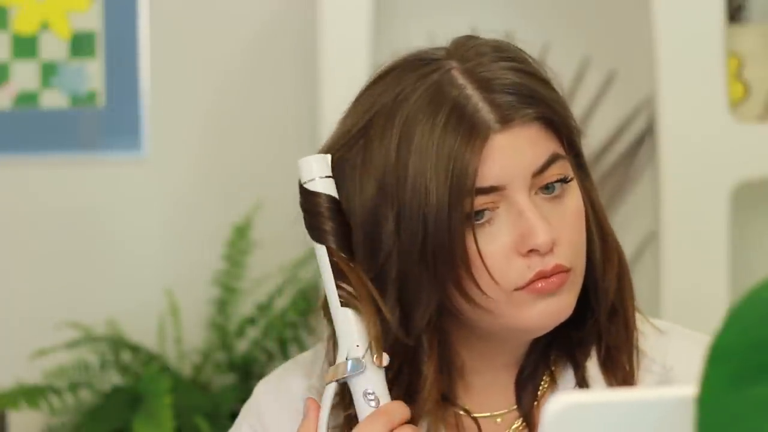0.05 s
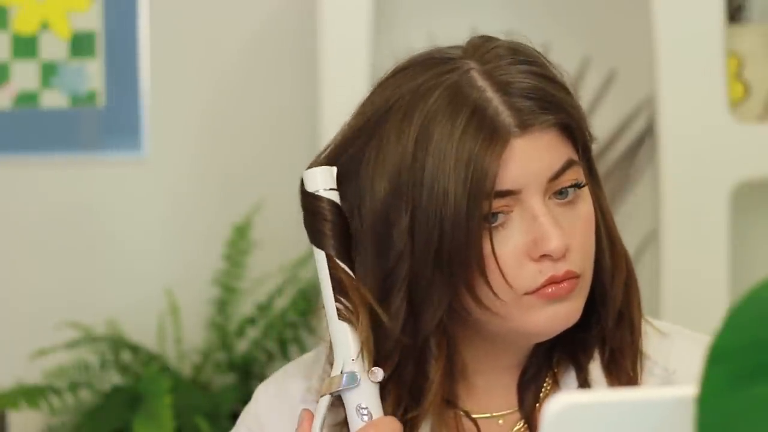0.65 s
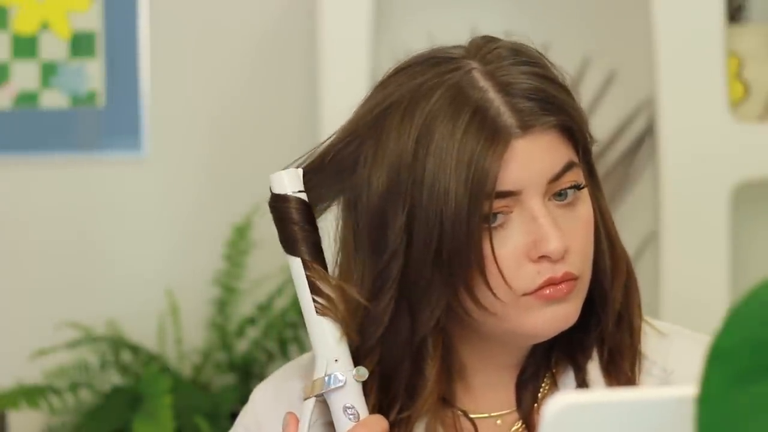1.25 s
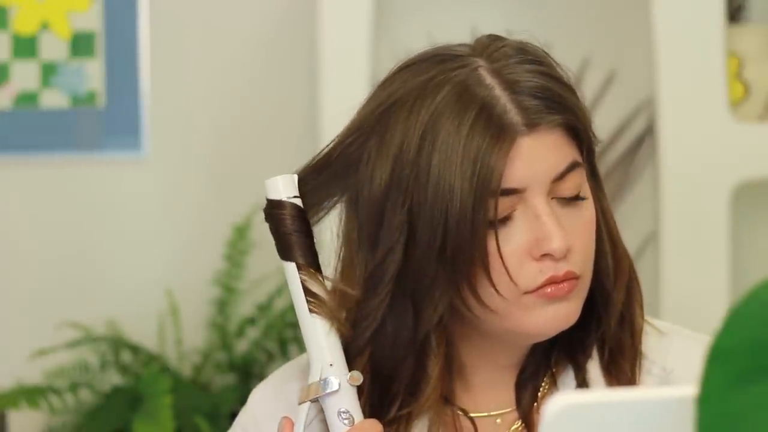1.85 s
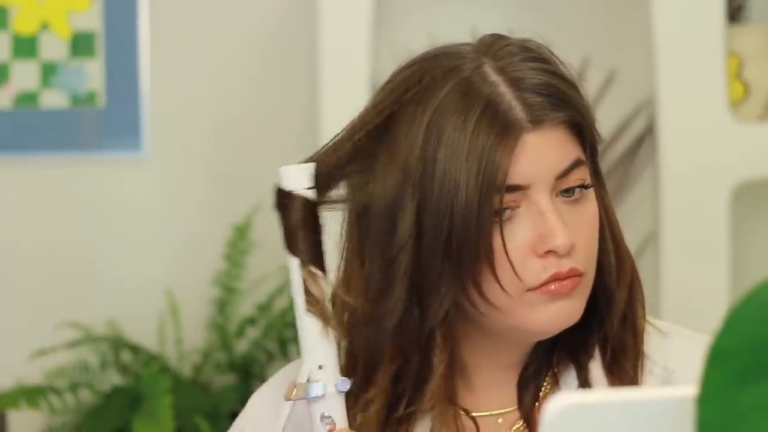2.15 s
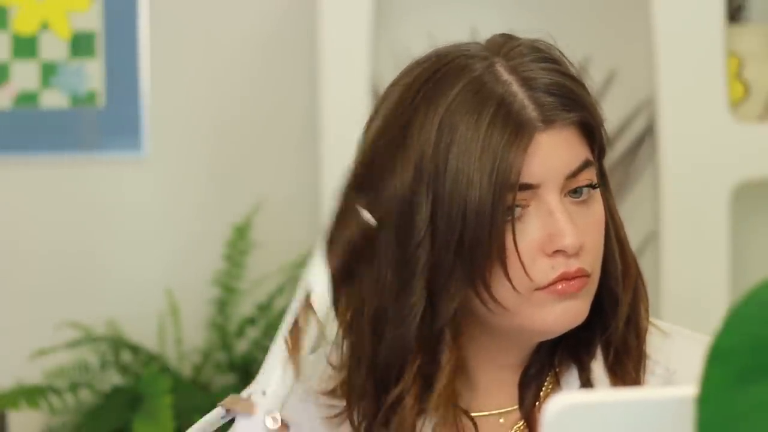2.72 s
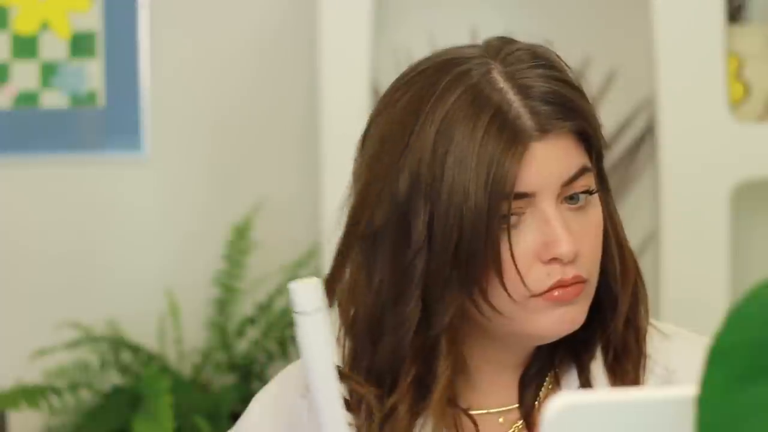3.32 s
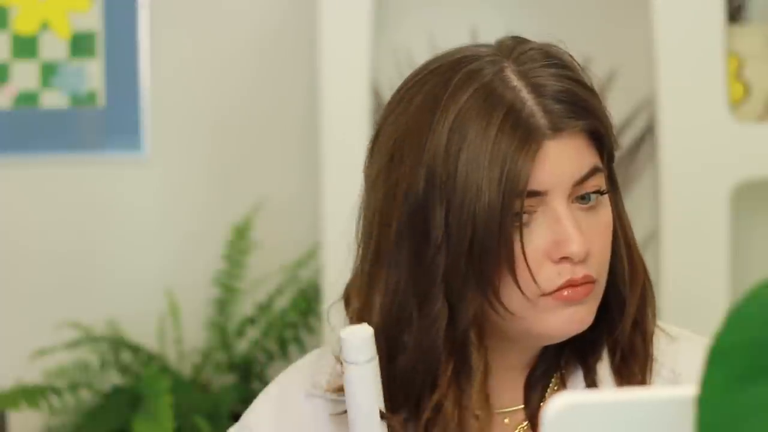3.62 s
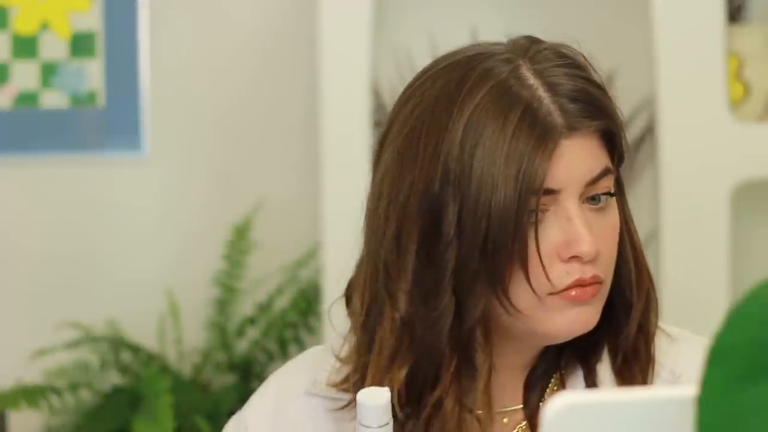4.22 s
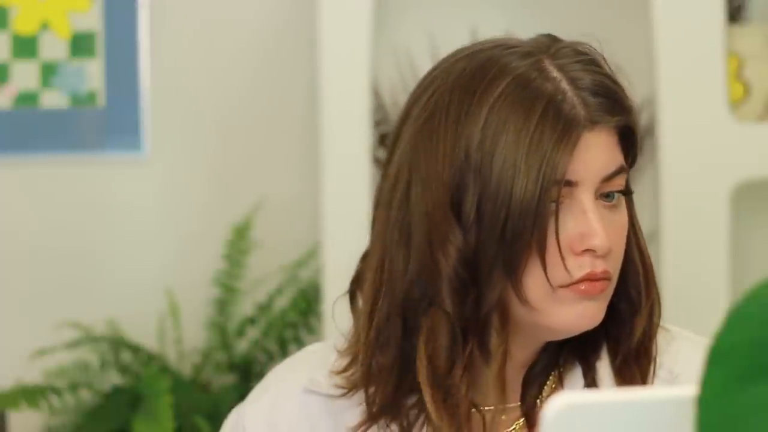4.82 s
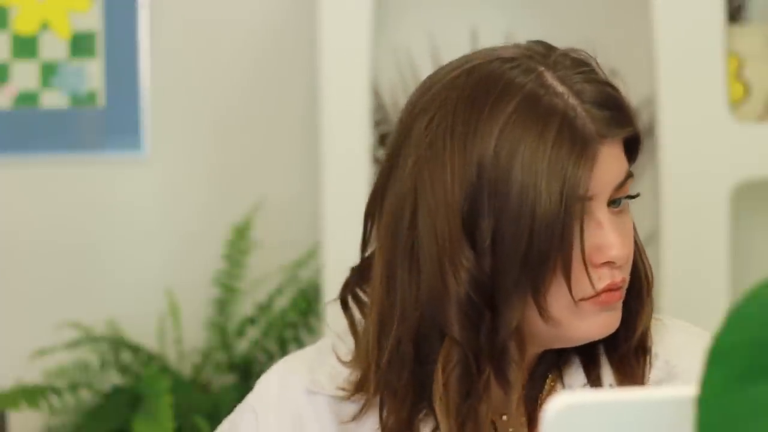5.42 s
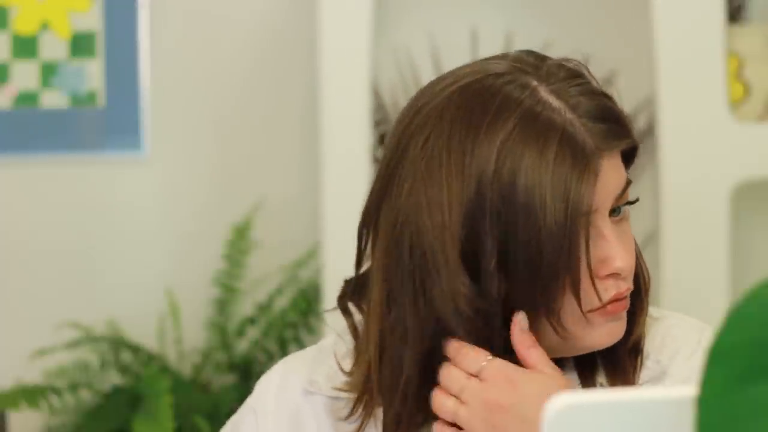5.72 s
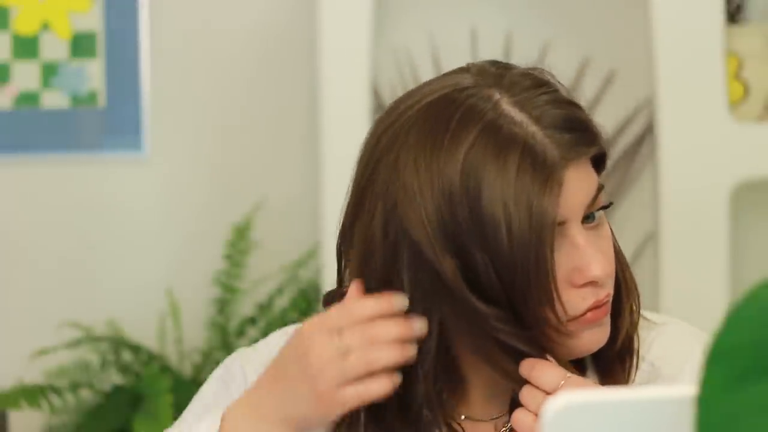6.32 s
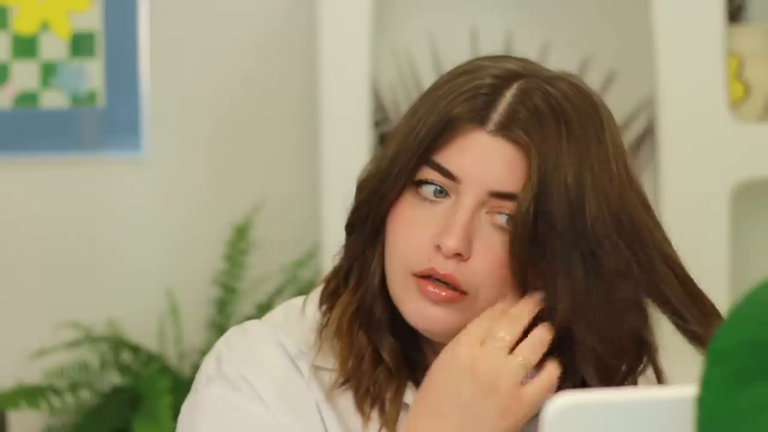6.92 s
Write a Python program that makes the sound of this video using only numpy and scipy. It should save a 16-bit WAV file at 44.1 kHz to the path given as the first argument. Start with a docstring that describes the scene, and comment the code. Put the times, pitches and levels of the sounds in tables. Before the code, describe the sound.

Hair slides softly off a ticking curling iron in a quiet room, before the iron is put down with several hollow knocks.

```python
"""Hair rustles faintly, close to the microphone, over the low noise of a small, quiet room.
At a dressing table it is unwound from a curling iron: strands slide along the barrel and wake its
resonances, the clamp ticks, and the cord taps and drags on the table. At about 5.6 s the iron is
put down with a cluster of knocks that set the table ringing; then fingers go through the hair."""
import sys
import numpy as np
from scipy import signal
from scipy.fft import rfft, irfft
from scipy.io import wavfile
from scipy.ndimage import uniform_filter1d

SR = 44100
rng = np.random.default_rng(int(sys.argv[2]) if len(sys.argv) > 2 else 0)


def to_wav(s):
    """Save 16-bit WAV."""
    ch = np.atleast_2d(s).T  # columns
    pcm = np.round(np.clip(ch, -1, 1) * 32767)  # PCM
    wavfile.write(sys.argv[1], SR, pcm.astype(np.int16))


N = 306936
TIME = np.arange(N) / SR


def amp(db):
    """Decibels to gain."""
    return 10 ** (np.asarray(db) / 20)


def unit(x, size=None):
    """Scales x to rms 1, or to the energy of size samples of rms 1."""
    return x / np.sqrt(np.sum(x ** 2) / (size or len(x)) + 1e-20)


def read(points, hz):
    """Reads a curve on a log-frequency axis."""
    f, value = np.transpose(points)
    return np.interp(np.log(hz + 1), np.log(f + 1), value)


def add(mix, s, sound):
    """Mixes a sound in at s seconds."""
    part = mix[round(s * SR):][:len(sound)]
    part += sound[:len(part)]


def colour(x, points):
    """Gives x a spectral shape."""
    return irfft(rfft(x) * amp(read(points, np.fft.rfftfreq(len(x), 1 / SR))), len(x))


def resonate(x, modes):
    """Passes x through a bank of resonances, each applied twice for dark valleys between them."""
    out = np.zeros(len(x))
    for hz, width, db in modes:
        peak = signal.iirpeak(hz, hz / (1.55 * width), SR)  # the second pass narrows it again
        out += amp(db) * signal.lfilter(*peak, signal.lfilter(*peak, x))
    return out


def waver(per_s):
    """A smooth random wander of rms 1."""
    return unit(np.interp(TIME * per_s, np.arange(N), rng.standard_normal(N)))


def friction(per_s, spread_db, blur):
    """Tiny slips of uneven size over a blur of still smaller ones."""
    slips = (rng.random(N) < per_s / SR) * rng.choice([-1, 1], N)
    sizes = amp(spread_db * np.minimum(rng.exponential(1, N), 4))
    return unit(unit(slips * sizes) + blur * rng.standard_normal(N))


def movements(moves, attack_s, sag_db_per_s, release_db_per_s):
    """Gain over time: each movement swells, sags while it lasts, and dies away."""
    power = np.zeros(N)
    for s, length, db in moves:
        t = TIME - s
        fall_db = sag_db_per_s * np.clip(t, 0, length) + release_db_per_s * np.maximum(t - length, 0)
        power += (np.clip(1 + t / attack_s, 0, 1) * amp(db - fall_db)) ** 2
    return np.sqrt(power)


def pull(peak_s, peak_db, rise_db_per_s, fall_db_per_s):
    """Gain over time of the long pull that unwinds the curl: one slow swell and ebb."""
    return amp(peak_db - np.maximum(rise_db_per_s * (peak_s - TIME), fall_db_per_s * (TIME - peak_s)))


# Room tone, all around the microphone: (frequency [Hz], density [dB])
AIR_SPECTRUM = [(20, -17.5), (55, -4), (90, -7), (120, 1.5), (160, -6), (250, -7.5), (350, -13.5),
                (600, -16), (1200, -23.5), (3000, -30), (8000, -37.5), (16000, -44)]
def air(level_db=-65.5):
    """Low, steady noise of the still room."""
    return amp(level_db) * unit(colour(rng.standard_normal(N), AIR_SPECTRUM))


# Tone of what the walls send back: (frequency [Hz], gain [dB])
WALL_COLOUR = [(60, 0.5), (170, 0.5), (230, -5), (285, 6), (350, -0.5), (480, -0.5), (1000, 0), (2500, -4),
               (6000, -5.5), (12000, -5)]
# Reverberation of the small room: (frequency [Hz], t60 [s])
ROOM_DECAY = [(60, 0.63), (280, .47), (600, 0.46), (1500, 0.35), (5000, 0.3), (10000, 0.24), (16000, 0.073)]
def room(x, first_s=0.0044):
    """Dense reflections from near walls, each band dying at its own speed."""
    echoes = colour(rng.standard_normal(SR) * (rng.random(SR) < 5000 / SR), WALL_COLOUR)
    hz, t, bands = signal.stft(echoes, SR, nperseg=256)
    decay = amp(-60 * t / read(ROOM_DECAY, hz)[:, None])
    tail = signal.istft(bands * decay, SR, nperseg=256)[1][:SR]
    tail *= np.clip(TIME[:SR] / first_s - 1, 0, 1)
    return signal.fftconvolve(x, amp(-1.5) * unit(tail, size=1))[:N]


# Resonances of the cord on the table's edge: (frequency [Hz], width [Hz], gain [dB])
CORD_MODES = [(428.3, 20, -8.5), (477, 45, 2), (672, 130, -10.5), (1220, 54, -17)]
# Drags over the table, close by: (time [s], length [s], level [dB])
CORD_DRAGS = [(2.67, 0.047, -54), (2.99, 0.14, -58), (3.175, 0.033, -52), (3.32, .015, -60.5),
              (3.5, .02, -60.5), (4.81, 0.17, -68.5)]
def cord_drag(steadiness=0.92):
    """The cord sticks and slips on the edge; the slipping feeds itself into a soft, hollow drone."""
    drone = resonate(friction(per_s=160, spread_db=-4, blur=0.54), CORD_MODES)
    running_rms = np.sqrt(abs(uniform_filter1d(drone ** 2, size=400)) + 1e-12)
    dragging = movements(CORD_DRAGS, attack_s=0.041, sag_db_per_s=10, release_db_per_s=180)
    return dragging * unit(drone / running_rms ** steadiness)


# Metal parts, just before the iron is put down: (time [s], level [dB], frequency [Hz], t60 [s])
METAL_CLINKS = [(5.387, -53.5, 14770, .02), (5.441, -27.5, 15790, 0.028)]
def clinks(snap=0.11):
    """A small metal part gives a snap and a very high, short ring."""
    out, t = np.zeros(N), np.arange(4096) / SR
    for s, db, hz, t60 in METAL_CLINKS:
        ring = np.sin(2 * np.pi * hz * t) * amp(-60 * t / t60)
        bright_noise = colour(rng.standard_normal(len(t)), [(3000, -8), (7500, 0.5), (10000, 15.5)])
        add(out, s, amp(db) * (ring + snap * bright_noise * np.exp(-t / 0.002)))
    return out


def stray_ticks(start_s=1.7, end_s=4.4, per_s=2.7, db=-58, hz=7060, t60=0.015):
    """Faint ticks at random moments while the iron turns."""
    chosen = (rng.random(N) < per_s / SR) & (TIME > start_s) & (TIME < end_s)
    return [(s, db, hz, t60) for s in TIME[chosen]]


def gripped(modes, damping_hz=170):
    """The hand widens and weakens resonances, most of all the sharp ones."""
    return [(hz, width + damping_hz, db - 20 * np.log10(1 + damping_hz / width))
            for hz, width, db in modes]


# Resonances of the bare barrel and clamp: (frequency [Hz], width [Hz], gain [dB])
IRON_MODES = [(1098, 370, -1), (2810, 220, -6.5), (3277, 100, 1), (4095, 400, -0.5), (4780, 370, -3.5),
              (5080, 600, -3), (5620, 380, -9), (6600, 242, -7), (7350, 120, 0.5), (8600, 250, -8),
              (9380, 270, -2.5), (15060, 500, -12.5)]
# The clamp, close to the microphone: (time [s], relative level [dB], brightest pitch [Hz], t60 [s])
CLAMP_TICKS = [(2.167, -45, 4600, 0.11), (2.287, -52.5, 6000, .03), (3.0419, -45, 4500, 0.0073),
               (3.5016, -43.5, 3300, 0.012), (4.0566, -45.5, 4940, 0.034), (4.317, -45, 3920, 0.014),
               (4.3297, -32.5, 4900, 0.0062), (4.433, -46.5, 4900, 0.0081), (4.5313, -53.5, 3500, .018),
               (4.668, -42.5, 6200, 0.051), (4.7119, -28.5, 4020, 0.01), (5.136, -33.5, 2870, 0.0036)]
def clamp(gain_db=-4.5, scrape=2.4, detune=0.024, focus_db_per_octave=7):
    """The clamp lets go with a snap and a brief scrape; the grip shifts the iron's pitches each time."""
    out, t = np.zeros(N), np.arange(2048) / SR
    for s, db, hz, t60 in CLAMP_TICKS + stray_ticks():
        scraping = unit(rng.standard_normal(len(t)) * amp(-60 * t / t60), size=1)
        slip = signal.unit_impulse(len(t)) + scrape * scraping
        grip = 1 + detune * rng.uniform(-1, 1)
        modes = [(f * grip, width, mode_db - focus_db_per_octave * abs(np.log2(f / hz)))
                 for f, width, mode_db in gripped(IRON_MODES)]
        contact = signal.lfilter(*signal.iirpeak(hz, 1.2, SR), slip)
        tick = unit(resonate(slip, modes)) + unit(contact)
        add(out, s, amp(db + gain_db) * unit(tick, size=88))
    return out


# Hair heard from close up: (frequency [Hz], density [dB])
HAIR_SPECTRUM = [(100, -11.5), (400, 3), (1200, 1), (2500, 0.5), (4000, -2), (7000, -2.5), (10000, -4.5),
                 (16000, -12)]
# Strokes through the hair: (time [s], length [s], relative level [dB])
HAIR_STROKES = [(0, 0.19, -78), (.25, .29, -73.5), (.82, 0.12, -77), (5.2, .15, -67), (5.4, 1, -59),
                (6.265, 0.32, -61), (6.67, 0.018, -69.5), (6.9, .04, -73.5)]
def hair_rustle(gain_db=6, flutter_db=0.91):
    """Strands crackle over each other during the long pull and with each stroke."""
    crackle = unit(colour(friction(per_s=2500, spread_db=-2, blur=1), HAIR_SPECTRUM))
    unwinding = pull(peak_s=3, peak_db=-69.5, rise_db_per_s=6, fall_db_per_s=3.5)
    stroking = movements(HAIR_STROKES, attack_s=0.1, sag_db_per_s=29, release_db_per_s=110)
    return amp(gain_db + flutter_db * waver(per_s=16)) * np.hypot(unwinding, stroking) * crackle


# Resonances of the barrel wrapped in hair: (frequency [Hz], width [Hz], gain [dB])
WRAPPED_MODES = [(4540, 440, -1.5), (7300, 260, 0), (8880, 250, -0.5), (9470, 430, -1), (15100, 970, -16)]
# The curl leaving the barrel: (time [s], bare share [0-1])
BARE_SHARE = [(2.6, 0), (3.3, 1)]
# Short rubs on the barrel, close by: (time [s], length [s], relative level [dB])
BARREL_RUBS = [(.44, 0.1, -69.5), (.79, 0.15, -73.5), (4.31, 0.076, -62.5), (4.59, 0.13, -63.5),
               (5.115, 0.01, -62)]
def hair_slide(gain_db=-1, flutter_db=1.4):
    """Sliding strands wake the barrel's resonances, which change as it comes free of the hair."""
    rub = friction(per_s=600, spread_db=3.8, blur=0.8)
    bare = np.interp(TIME, *np.transpose(BARE_SHARE))
    barrel = bare * unit(resonate(rub, IRON_MODES)) + (1 - bare) * unit(resonate(rub, WRAPPED_MODES))
    unwinding = pull(peak_s=3.5, peak_db=-63.5, rise_db_per_s=13.5, fall_db_per_s=17.5)
    rubbing = movements(BARREL_RUBS, attack_s=0.043, sag_db_per_s=21, release_db_per_s=260)
    return amp(gain_db + flutter_db * waver(per_s=32)) * np.hypot(unwinding, rubbing) * barrel


# Hard plastic striking the table: (frequency [Hz], density [dB])
PLASTIC_SPECTRUM = [(150, -24), (700, 6.5), (1500, 4), (2050, -1.5), (2700, -3), (4200, -2), (6500, -1.4),
                    (10000, -2.3), (16000, -8.5)]
def crack(db, centre_hz, t60_cycles=77, bite=0.94, rise_s=0.00012):
    """Hard plastic: a short, dense ringing toward the microphone, and an even snap spread all around."""
    t = np.arange(SR // 2) / SR
    t60 = t60_cycles / centre_hz
    steepness_db = 2.03 + 0.082 * max(-31.5 - db, 0)  # gentle contacts last longer and so lack the top
    shape = [(hz, base_db - steepness_db * np.log2(hz / centre_hz) ** 2)
             for hz, base_db in PLASTIC_SPECTRUM]
    burst = colour(rng.standard_normal(len(t)), shape) * amp(-60 * t / t60) * (1 - np.exp(-t / rise_s))
    snap = colour(signal.unit_impulse(len(t), 64), shape)
    shell = signal.iirpeak(centre_hz, 3.5, SR)  # the struck part rings around its own pitch
    return [amp(db) * unit(x + bite * signal.lfilter(*shell, x), size=882) for x in (burst, snap)]


def ring(modes, centre_hz, focus_db_per_octave, detune=0.017, rise_cycles=0.4):
    """Dying modes; the place and hardness of the blow favour those near one pitch."""
    t = np.arange(SR // 2) / SR
    hz, db, t60 = np.transpose(modes)[:, :, None]
    db = db - focus_db_per_octave * abs(np.log2(hz / centre_hz))
    sign = (-1) ** np.arange(len(hz))[:, None]
    swell = 1 - np.exp(-t * hz / rise_cycles)
    tones = np.sin(2 * np.pi * hz * (1 + detune * rng.standard_normal(hz.shape)) * t)
    return unit((sign * amp(db - 60 * t / t60) * swell * tones).sum(0), size=882)


# Modes of the dressing table and the things on it: (frequency [Hz], gain [dB], t60 [s])
TABLE_MODES = [(62.8, -9.5, 0.26), (84, -9, 0.093), (112, -4, 0.049), (157.7, -1, 0.098), (220, 4, 0.042),
               (255, -1.5, 0.11), (295.8, 0.5, 0.11), (425, 5, 0.03), (450.4, 1.5, 0.044), (496, -8.5, .12),
               (580, -12.5, 0.046), (726, -7.5, 0.051), (851, -14, 0.11), (935, -4.5, 0.034),
               (1020, -7.5, 0.037), (1106, -5, 0.028), (1313, -9, 0.062), (1340, -18, 0.037),
               (1500, -19.5, 0.022), (1770, -5.5, 0.044)]
def knock(thud_db, thud_hz, body_db, body_hz, crack_db, crack_hz, room_db):
    """One blow: the table's low thud, its hollow body and a crack, with the room's answer."""
    thud = amp(thud_db) * ring([m for m in TABLE_MODES if m[0] < 350], thud_hz, focus_db_per_octave=9.5)
    body = amp(body_db) * ring([m for m in TABLE_MODES if m[0] >= 350], body_hz, focus_db_per_octave=7)
    burst, snap = crack(crack_db, crack_hz)
    sound = amp(room_db) * room(thud + body + snap)
    add(sound, 0, thud + body + burst)
    return sound


# The cord landing on the table top: (time [s], crack level [dB], crack pitch [Hz], room send [dB])
CORD_TAPS = [(2.5244, -31, 3000, -7.5), (2.579, -48.5, 2550, -0.5), (2.5885, -46.5, 2120, -7.5),
             (2.875, -46.5, 2030, -2.5), (2.9007, -49, 2400, -7), (2.9283, -51, 2200, -10),
             (5.3008, -39, 1900, -5.5), (5.4009, -49.5, 2020, -7.5), (5.532, -51.5, 2200, -10.5),
             (6.288, -60.5, 2310, -26)]
def cord_taps(firm_db=-30.5, hard_hz=2950, thud_hz=266, body_hz=505):
    """Light taps: weak ones lose the thud first; soft, dull contacts drive the table's body more."""
    out = np.zeros(N)
    for s, db, crack_hz, room_db in CORD_TAPS:
        strength_db = db - firm_db
        thud_db = -35.5 + 1.23 * strength_db
        body_db = -38.5 + 0.82 * strength_db + 9 * np.log2(hard_hz / crack_hz)
        add(out, s, knock(thud_db, thud_hz, body_db, body_hz, db, crack_hz, room_db))
    return out


# The iron landing on the table top, in the foreground: (time [s], thud level [dB], thud pitch [Hz],
# body level [dB], body pitch [Hz], crack level [dB], crack pitch [Hz])
IRON_KNOCKS = [(5.5702, -17.5, 122.2, -15.5, 475, -23.5, 2390), (5.742, -44, 200, -52, 796, -48, 2660),
               (5.7706, -22.5, 136, -35, 1020, -33.5, 4450), (5.7896, -26.5, 126.7, -49, 600, -36, 4840),
               (5.802, -28, 81.8, -27, 460, -40.5, 2720), (5.9064, -28.5, 227.7, -33.5, 760, -28.5, 3800),
               (5.9169, -44, 69.7, -33.5, 584, -48, 3540)]
def iron_knocks():
    """The iron is put down and rocks, landing on a different part each time."""
    out = np.zeros(N)
    for s, *blow in IRON_KNOCKS:
        add(out, s, knock(*blow, room_db=-14))
    return out


def scene():
    """Knocks on the table, small handling sounds close to the microphone, and room tone."""
    knocks = cord_taps() + iron_knocks()
    handling = clamp() + clinks() + hair_rustle() + hair_slide() + cord_drag()
    return (knocks + handling + amp(-16.5) * room(handling) + air())[None]


# Response of the one microphone at the dressing table: (frequency [Hz], gain [dB])
MIC_RESPONSE = [(20, -6), (40, -5), (55, 1), (10500, -0.5), (12200, -5), (13500, -4.5), (15200, 9.5),
                (16000, -6.5)]
def record(dry):
    """The microphone's uneven top octave, then the band limit at 16.3 kHz."""
    heard = colour(dry[0], MIC_RESPONSE)
    band_limit = signal.firwin(511, 16300, window=("kaiser", 9), fs=SR)
    return signal.oaconvolve(heard, band_limit, "same")[None]


dry = scene()
out = record(dry)
to_wav(out)
```